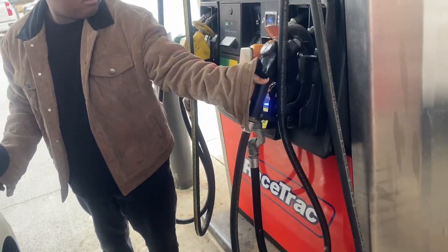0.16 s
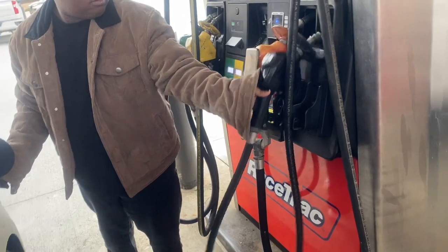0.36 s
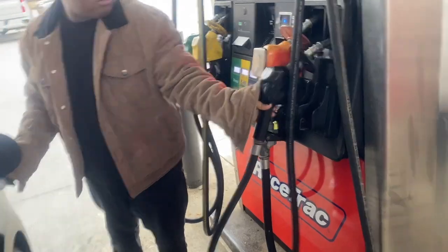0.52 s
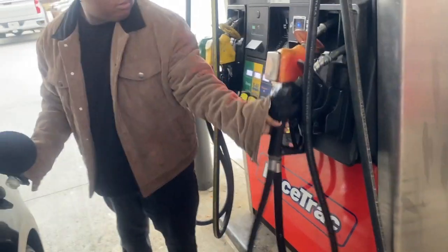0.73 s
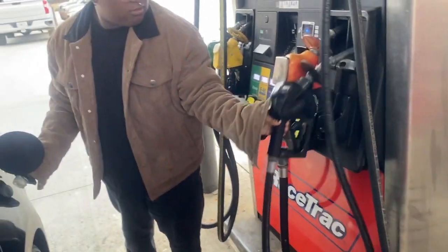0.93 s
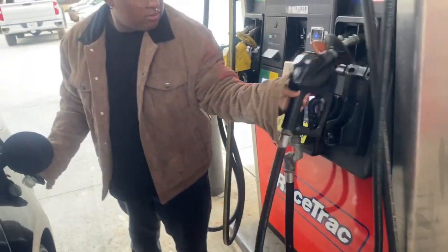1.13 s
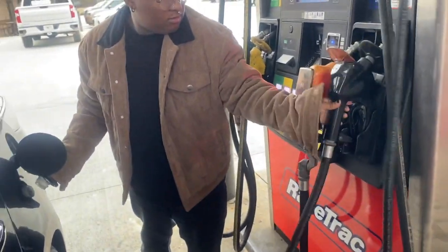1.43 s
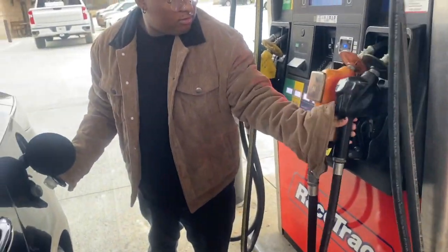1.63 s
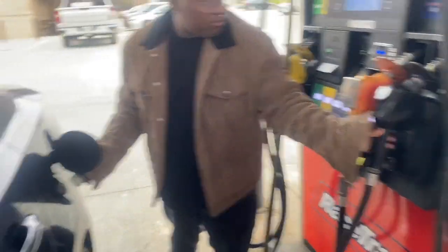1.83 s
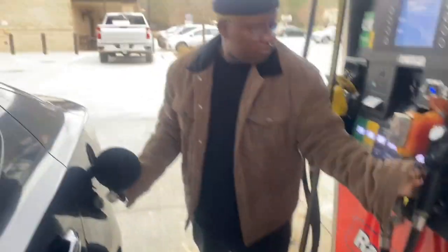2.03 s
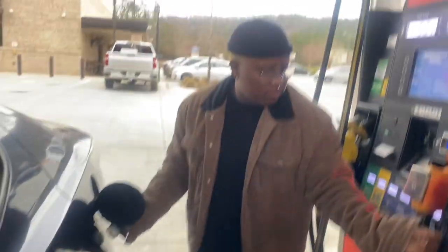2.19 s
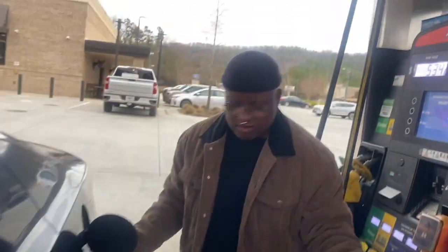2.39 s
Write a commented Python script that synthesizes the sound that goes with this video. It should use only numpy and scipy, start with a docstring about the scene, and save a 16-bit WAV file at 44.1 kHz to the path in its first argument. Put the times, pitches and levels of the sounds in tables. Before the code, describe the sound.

Close to a handheld phone at a petrol station, a metal nozzle clicks, then knocks hard in its hollow plastic boot and rattles off; distant road noise swells, and wind buffets the microphone last.

```python
"""A fuel nozzle is worked out of its plastic boot on the pump, over a drone of road traffic and wind.
First the lever clicks, with a thin squeak and small rattles; from one second on the cast body clunks
in the boot, while the traffic swells, and the last rattles fade before strong wind puffs after two seconds.
Metal and boot are ringing tones over dying noise, traffic and wind are shaped noise, puffs are short low waves.
The phone's gain control ducks after the loudest clunks, holds, and glides back."""
import sys
import numpy as np
from scipy import signal
from scipy.fft import rfft, irfft, next_fast_len
from scipy.io import wavfile
from scipy.ndimage import uniform_filter1d, minimum_filter1d, map_coordinates

SR = 44100
rng = np.random.default_rng(int(sys.argv[2]) if len(sys.argv) > 2 else 0)


def generate_wav(signal):
    """Clip the signal to [-1, 1] and save it as 16-bit WAV at the path in sys.argv[1]."""
    frames = np.transpose(np.atleast_2d(signal))
    scaled = np.clip(frames, -1, 1) * 32767
    pcm = np.round(scaled).astype(np.int16)
    wavfile.write(sys.argv[1], SR, pcm)


N = 112454  # length in samples


def amp(db):
    """Turn dB into gain."""
    return 10 ** (np.asarray(db) / 20)


def unit(x):
    """Scale to an rms of 1."""
    return x / np.sqrt(np.mean(x ** 2) + 1e-20)


def loud(x):
    """Scale so that the first 10 ms have an rms of 1."""
    return x / np.sqrt(np.mean(x[:SR // 100] ** 2))


def along(points, hz):
    """Read a curve of (Hz, value) points, joined on a log frequency axis."""
    f, v = np.transpose(points)
    return np.interp(np.log(hz + 1), np.log(f + 1), v)


def curve(rows):
    """Join (second, value) points into one value per sample."""
    return np.interp(np.arange(N) / SR, *np.transpose(rows))


def wobble(rate):
    """A smooth random curve through `rate` random points a second."""
    points = rng.standard_normal(int(N * rate / SR) + 4)
    return map_coordinates(points, [np.arange(N) * rate / SR])


def filtered(x, response):
    """Multiply the spectrum of x by a response that depends on frequency."""
    m = next_fast_len(N + SR // 2)
    return irfft(rfft(x, m) * response(np.fft.rfftfreq(m, 1 / SR)), m)[..., :N]


def noise_through(spectrum):
    """Noise of rms 1, coloured by (Hz, dB) points."""
    return unit(filtered(rng.standard_normal(N), lambda hz: amp(along(spectrum, hz))))


def rush(spectrum, alike, patchy_db):
    """Stereo noise of rms 1, uneven in time and pitch, with a set likeness of left and right."""
    z = signal.stft(rng.standard_normal((2, N)), nperseg=512)[2]
    patches = uniform_filter1d(rng.standard_normal(z.shape[1:]), 6, 0)
    patches = unit(uniform_filter1d(patches, 14, 1))
    pair = signal.istft(z * amp(patchy_db * patches), nperseg=512)[1][:, :N]

    def mid_and_side(hz):
        # the more alike the two sides, the more goes to the middle
        turn = np.arccos(np.clip(along(alike, hz), -1, 1)) / 2
        return amp(along(spectrum, hz)) * [np.cos(turn), np.sin(turn)]

    mid, side = filtered(pair, mid_and_side)
    return unit(np.array([mid + side, mid - side]))


# colour of the road noise. Each row: frequency in Hz, relative strength in dB per Hz
ROAD_COLOUR = [(88, -8.5), (150, -8.5), (689, -17.5), (832, -19), (2620, -31.5), (7080, -54.5),
               (19800, -120)]
# how alike left and right are. Each row: frequency in Hz, likeness (1 same, 0 unrelated, below 0 opposed)
ROAD_LIKENESS = [(180, 0.93), (550, -0.39), (1650, 0.11), (5000, 0.28)]
# swell of the road noise. Each row: time in seconds, level in dB before a small random wobble
TRAFFIC_LEVEL = [(0, -32), (.3, -30.5), (.6, -30.5), (.8, -29.5), (.9, -27.5), (1.3, -22), (1.7, -32),
                 (2.1, -29), (2.55, -32)]


def traffic():
    """Distant tyres and engines blend into a dull wash of low noise that swells and sinks."""
    level_db = curve(TRAFFIC_LEVEL) + 0.81 * wobble(6.04)
    return amp(level_db) * rush(ROAD_COLOUR, ROAD_LIKENESS, patchy_db=0.5)


# colour of the wind rumble. Each row: frequency in Hz, relative strength in dB per Hz
WIND_COLOUR = [(28, -32), (52, -3.5), (100, -2), (280, -26.5), (600, -66.5)]
# strength of the rumble. Each row: time in seconds, level in dB
WIND_LEVEL = [(0, -29.5), (.5, -26), (.8, -27.5), (1.8, -28.5), (2.1, -21.5), (2.55, -24.5)]
# single puffs. Each row: middle in seconds, peak in dB, pitch in Hz, half length in seconds
PUFFS = [(0.044, -25.5, 55, 0.022), (0.139, -23.5, 71.6, 0.061), (0.374, -23.5, 94.1, 0.14),
         (0.542, -20.5, 75, 0.043), (1.053, -18.5, 76, .02), (1.33, -13, 72, 0.019),
         (1.336, -21.5, 176, 0.032), (1.562, -23, 67, 0.022), (1.998, -30, 69.5, 0.019),
         (2.131, -24, 93, 0.02), (2.159, -7, 99, .012), (2.223, -11, 151.5, 0.015),
         (2.23, -14.5, 258.7, 0.0092), (2.246, -3.5, 71.4, 0.012), (2.412, -18, 87, 0.022)]


def wind():
    """Turbulent air presses on the microphone ports: low uneven noise plus short low waves."""
    t = np.arange(N) / SR
    rumble = rush(WIND_COLOUR, [(30, 1.0), (300, 0.29)], patchy_db=4.5)
    puffs = np.zeros(N)
    for middle, db, hz, half in PUFFS:
        swell = np.exp(-((t - middle) / half) ** 2)
        puffs += amp(db) * swell * np.cos(2 * np.pi * hz * (t - middle))
    return amp(curve(WIND_LEVEL)) * rumble + puffs


# rustles of hose, sleeve or wind. Each row: middle in seconds, level in dB, centre in Hz, half length in seconds
SOFT_RUSTLES = [(0.447, -29, 1790, 0.017), (0.588, -33, 403, 0.019), (0.878, -25.5, 240, 0.037),
                (1.994, -27, 230, 0.022), (2.103, -46, 1670, 0.094), (2.224, -25.5, 325, 0.017)]


def rustles():
    """Soft rustles of hose, sleeve or gusting wind: swells of noise strongest around a centre pitch."""
    t, out = np.arange(N) / SR, np.zeros(N)
    slope = 14  # dB per octave
    for middle, db, centre, half in SOFT_RUSTLES:
        def band(hz):
            return amp(-slope * abs(np.log2((hz + 1) / centre)))
        rustle = unit(filtered(rng.standard_normal(N), band))
        out += amp(db) * np.exp(-((t - middle) / half) ** 2) * rustle
    return out


# colour of a hard metal click. Each row: frequency in Hz, relative strength in dB
CLICK_COLOUR = [(1500, -34), (3000, -4.5), (5000, -0.5), (9000, -7.5), (15000, -2.5), (16300, -43)]
# faint ticks. Each row: start in seconds, starting level in dB
TICK_STARTS = [(.160, -54), (0.6406, -42), (0.7864, -45), (0.865, -52), (2.095, -47.5)]
TICK_T60_S = 0.038  # time to fall by 60 dB


def ticks():
    """Loose metal ticks faintly: click-coloured noise that starts at once and dies fast."""
    t = np.arange(N) / SR
    fade = sum(amp(db - 60 * abs(t - s) / TICK_T60_S) * (t > s) for s, db in TICK_STARTS)
    return fade * noise_through(CLICK_COLOUR)


# squeaks of the lever spring. Each row: middle in seconds, peak in dB, half length in seconds
SPRING_SQUEAKS = [(0.1375, -33.5, 0.0067), (1.848, -51, 0.007)]
SQUEAK_HZ = 5250


def squeaks():
    """The lever spring squeaks: brief bursts of one thin high tone."""
    t = np.arange(N) / SR
    swell = sum(amp(db) * np.exp(-((t - s) / half) ** 4) for s, db, half in SPRING_SQUEAKS)
    return swell * np.sin(2 * np.pi * SQUEAK_HZ * t)


SPOT_DB_PER_OCTAVE = 20  # how fast ringing tones weaken away from the struck spot's pitch
RATTLE_DB_PER_OCTAVE = 4  # the same for the rattle
PUSH_RADIANS = 3  # slowness of the push, in radians of each tone's cycle


def part(modes, broad, ring_db, rattle, spot_hz):
    """A push rings the tones near the struck spot, over a dead rattle that leans to the same pitch."""
    f = np.fft.rfftfreq(len(rattle), 1 / SR)
    ring = 0
    for k, (centre, width, db) in enumerate(modes):
        gain = amp(db - SPOT_DB_PER_OCTAVE * abs(np.log2(centre / spot_hz)))
        resonance = 1j * f * width / (centre ** 2 - f ** 2 + 1j * f * width)
        push = 1 / (1 + 1j * (f - centre) * PUSH_RADIANS / centre)
        ring = ring + (-1) ** k * gain * resonance * push  # neighbours swing opposite ways
    colour = amp(along(broad, f) - RATTLE_DB_PER_OCTAVE * abs(np.log2((f + 1) / spot_hz)))
    dead_rattle = irfft(rfft(rattle) * colour, len(rattle))
    return amp(ring_db) * loud(irfft(ring, len(rattle))) + loud(dead_rattle)


# ringing tones of each part. Each row: pitch in Hz, width in Hz, dB before the lean to the struck spot
LATCH_TONES = [(3560, 110, -4), (4000, 80, -4), (6600, 60, -4), (7000, 200, -2), (7500, 150, -2),
               (8200, 40, -4)]
BODY_TONES = [(956, 75, 13), (1230, 540, -2), (1693, 93, -2.5), (1898, 53, 3.5), (2172, 90, -2),
              (2588, 18, -4.5), (2930, 300, -4.5)]
BOOT_TONES = [(349.4, 16.6, -6.5), (471.2, 77, -1.5), (609, 34, 1)]
# rattle colour of body and boot. Each row: frequency in Hz, dB before the lean to the struck spot
KNOCK_COLOUR = [(300, -37), (1100, -6), (2800, -10), (9000, -37)]
THUD_COLOUR = [(60, -27), (200, 1), (480, -2.5), (2500, -17)]
# one number each for latch, body and boot: ring over the dead rattle in dB, then length factor of the rattle
RING_OVER_RATTLE = [-4, 4, 8]
RATTLE_LENGTHS = [0.83, 1, 1.37]
# metal contacts. Each row: start in seconds, latch, body and boot levels in dB before the trims below,
# rattle's 60 dB fall in seconds before the length factor, favoured latch, body and boot pitches in Hz
STRIKES = [(0.0295, -17.5, -35.5, -34.5, 0.032, 6460, 1700, 468),
           (0.0962, -29.5, -32.5, -34, 0.048, 3300, 1860, 342),
           (0.1287, -24, -31, -35.5, 0.02, 8200, 3030, 525),
           (0.3509, -36.5, -39.5, -43, 0.25, 4350, 1318, 374),
           (0.4308, -7, -28.5, -30.5, 0.015, 3670, 1960, 320),
           (0.491, -29.5, -26.5, -33, 0.071, 4290, 1650, 436),
           (0.6971, -34, -35, -30.5, 0.27, 4060, 1950, 470),
           (0.8864, -37, -38.5, -29, 0.24, 3390, 1850, 374),
           (0.9974, -39, -44, -30.5, 0.073, 4380, 1130, 347),
           (1.0116, -17, -26.5, -22, 0.068, 4060, 1944, 424),
           (1.0179, -7, -17, -12.5, 0.039, 7600, 1720, 456),
           (1.0227, -34, -21, -17.5, 0.029, 6650, 2100, 450),
           (1.0393, -21, -26.5, -24, 0.07, 4840, 1720, 482),
           (1.0606, -4.5, -16, -22.5, 0.035, 7700, 2600, 600),
           (1.0645, -8.5, -7, -13.5, 0.028, 6600, 1830, 625),
           (1.2083, -15.5, -24, -31, 0.028, 3870, 1900, 580),
           (1.2354, -29.5, -27.5, -41, 0.062, 3630, 1270, 342),
           (1.292, -11.5, -17.5, -19.5, 0.12, 6960, 2280, 356),
           (1.2983, -12.5, -18.5, -15.5, 0.042, 3500, 1470, 392),
           (1.3193, -19, -22, -22.5, 0.065, 4500, 944.4, 334),
           (1.3586, -7.5, -20, -16, 0.017, 6500, 1050, 697),
           (1.3617, -21.5, -16.5, -17, 0.021, 7100, 1930, 556),
           (1.5227, -17.5, -20, -16.5, 0.1, 5200, 2159, 590),
           (1.5468, -15.5, -26.5, -27.5, 0.069, 3500, 2200, 575),
           (1.554, -29, -26.5, -23, 0.22, 4340, 2370, 455),
           (1.5857, -30.5, -34.5, -26, 0.037, 3320, 1041, 354),
           (1.6699, -36.5, -33.5, -29.5, 0.039, 3550, 1340, 335)]
LATCH_TRIM_DB, BODY_TRIM_DB, BOOT_TRIM_DB = -11, -6, -7
RISE_S = 0.0016  # time constant of the rattle's rise
GRAIN_DB = 3  # unevenness of a rattle


def nozzle():
    """Each contact pushes latch, cast body and hollow boot, which ring and rattle grainily as they die."""
    t, out = np.arange(SR // 4) / SR, np.zeros(N + SR)
    for s, latch_db, body_db, boot_db, t60, latch_hz, body_hz, boot_hz in STRIKES:
        grain = uniform_filter1d(rng.standard_normal(len(t)), size=SR // 700)
        grain = amp(GRAIN_DB * unit(grain))
        rise = 1 - np.exp(-t / RISE_S)
        fall = amp(-60 * t / (max(t60, .005) * np.c_[RATTLE_LENGTHS]))
        rattle = rise * fall * grain * rng.standard_normal((3, len(t)))
        latch = part(LATCH_TONES, CLICK_COLOUR, RING_OVER_RATTLE[0], rattle[0], latch_hz)
        body = part(BODY_TONES, KNOCK_COLOUR, RING_OVER_RATTLE[1], rattle[1], body_hz)
        boot = part(BOOT_TONES, THUD_COLOUR, RING_OVER_RATTLE[2], rattle[2], boot_hz)
        strike = amp(latch_db + LATCH_TRIM_DB) * latch
        strike += amp(body_db + BODY_TRIM_DB) * body
        strike += amp(boot_db + BOOT_TRIM_DB) * boot
        out[round(s * SR):][:SR // 5] += strike[:SR // 5]
    return out[:N]


# phase between the ports. Each row: frequency in Hz, lead of the left in radians
PHASE_LEAD = [(520, 7), (700, 0.2), (2500, 1), (5500, 1.5), (8400, -2), (11000, -7.5), (15000, -10.5)]
# level between the ports. Each row: frequency in Hz, left minus right in dB
LEVEL_LEAD = [(500, 0.5), (1200, -4.5), (2500, 5.5), (8000, 0)]


def ports(x):
    """A near sound reaches the two microphone ports with different phase and level."""
    half = np.array([[.5], [-.5]])  # left gets half the difference, right the opposite half

    def response(hz):
        return amp(half * along(LEVEL_LEAD, hz)) * np.exp(1j * half * along(PHASE_LEAD, hz))

    return filtered(x, response)


# echo of pump and canopy. Each row: frequency in Hz, time to fall by 60 dB in seconds
ECHO_FALL = [(300, 0.15), (2000, 0.2), (8000, 0.11)]


def echo(x):
    """Pump and canopy answer with a noisy tail in which each frequency dies at its own speed."""
    hz, t, z = signal.stft(rng.standard_normal((2, SR // 3)), SR, nperseg=256)
    fall = amp(-60 * t / along(ECHO_FALL, hz)[:, None])
    tail = signal.istft(z * fall, SR, nperseg=256)[1]
    tail = tail / np.linalg.norm(tail[0])
    late = np.pad(x, (200, 0))  # the answer starts 200 samples late
    return signal.fftconvolve(late[None], tail, axes=1)[:, :N]


ECHO_DB = -11


def scene():
    """Traffic and wind lie under the near nozzle sounds, the rustles and their echo."""
    near = nozzle() + squeaks() + ticks() + rustles()
    return ports(near) + amp(ECHO_DB) * echo(near) + traffic() + wind()


# colour of the microphone's own hiss. Each row: frequency in Hz, relative strength in dB per Hz
HISS_COLOUR = [(1000, -27), (3000, 5), (7000, 11.5), (16000, -1.5)]
HISS_DB = -63
DUCK_FROM_DB, DUCK_DB = -13, 14  # level where ducking begins, deepest cut
DUCK_HOLD_S, DUCK_GLIDE_S = 0.13, 0.064  # hold, time constant of the glide down and back
TOP_HZ = 16600


def record(dry):
    """Gain control ducks on loud clunks, holds and glides back; then hiss, soft ceiling and band limit."""
    bright = filtered(dry.mean(0), lambda hz: hz > 300)  # low wind does not trigger it
    power = abs(uniform_filter1d(bright ** 2, SR // 100))
    level_db = 10 * np.log10(power + 1e-12)
    need = np.clip((level_db - DUCK_FROM_DB) / 6, 0, 1)  # full cut 6 dB above the start
    hold = round(DUCK_HOLD_S * SR)
    held = -minimum_filter1d(-need, hold, origin=(hold - 1) // 2)  # greatest need of the recent past
    keep = np.exp(-1 / (DUCK_GLIDE_S * SR))
    duck = signal.lfilter([1 - keep], [1, -keep], held)
    x = dry * amp(-DUCK_DB * duck)
    x = x + amp(HISS_DB) * rush(HISS_COLOUR, [(5000, 0)], patchy_db=1)
    x = x / (1 + abs(x) ** 6) ** (1 / 6)  # soft ceiling
    return filtered(x, lambda hz: hz < TOP_HZ)


dry = scene()
out = record(dry)
generate_wav(out)
```